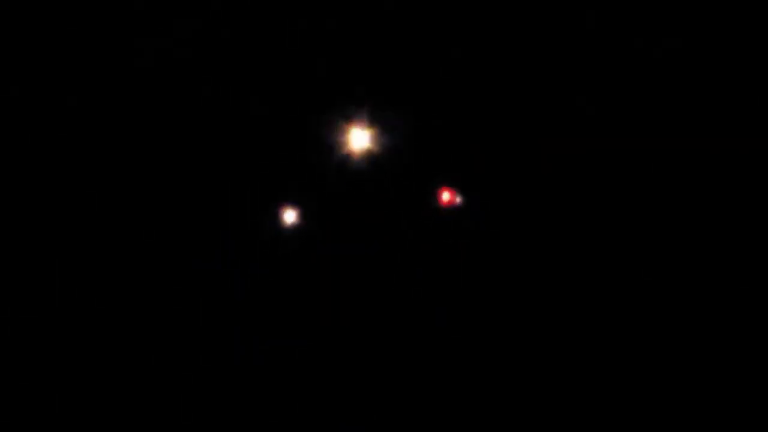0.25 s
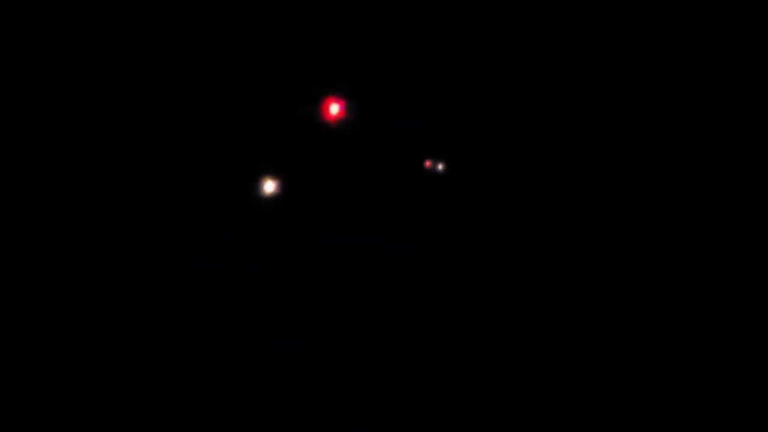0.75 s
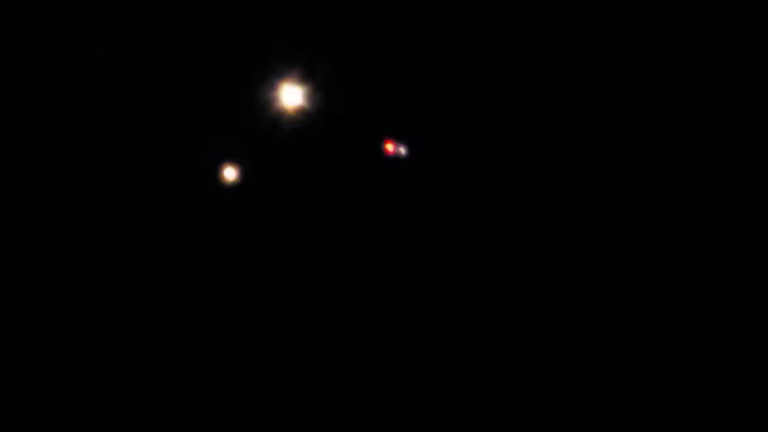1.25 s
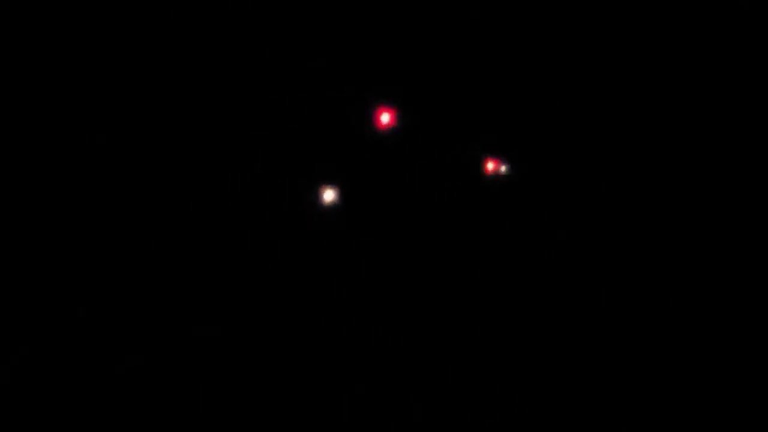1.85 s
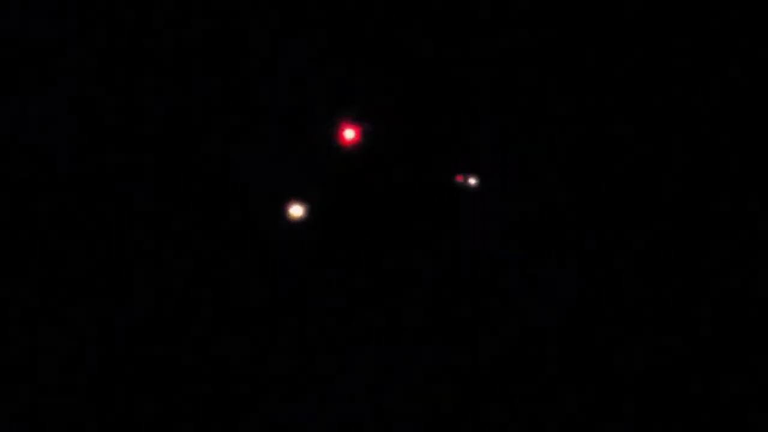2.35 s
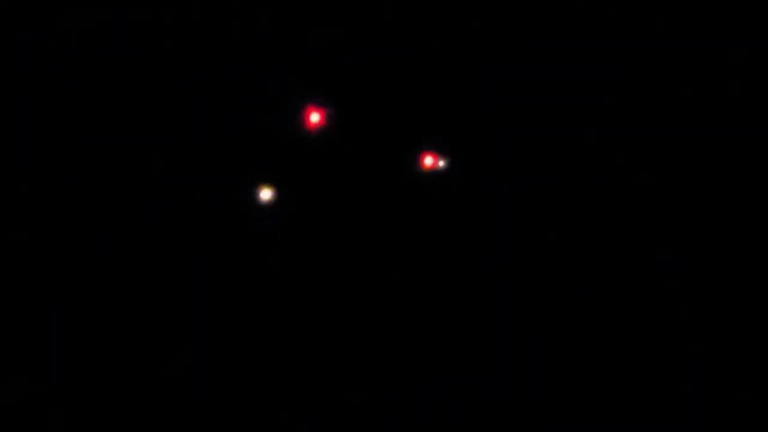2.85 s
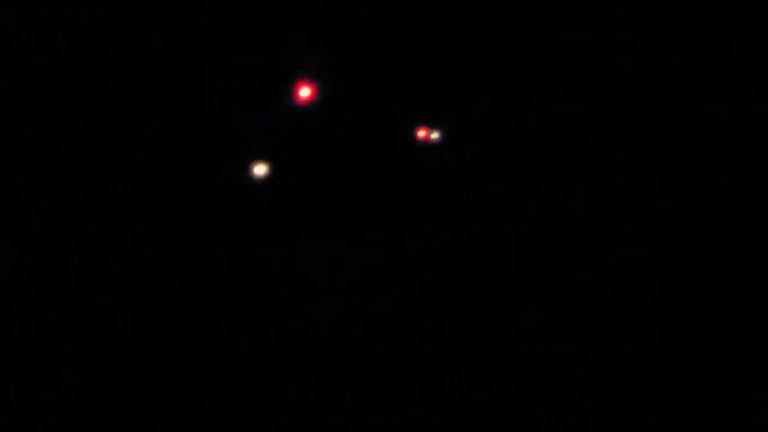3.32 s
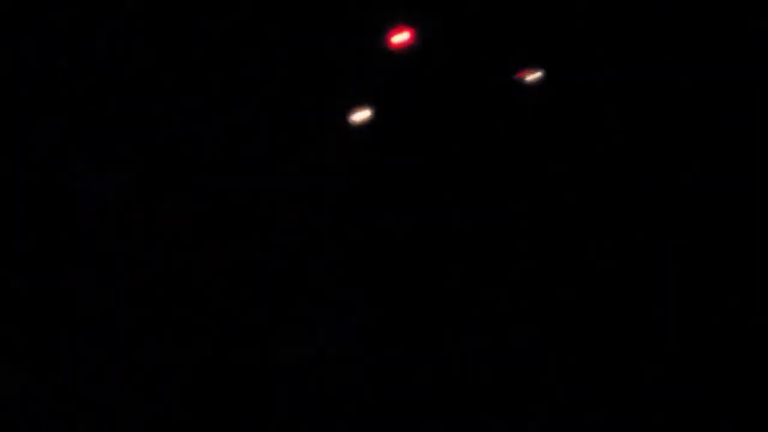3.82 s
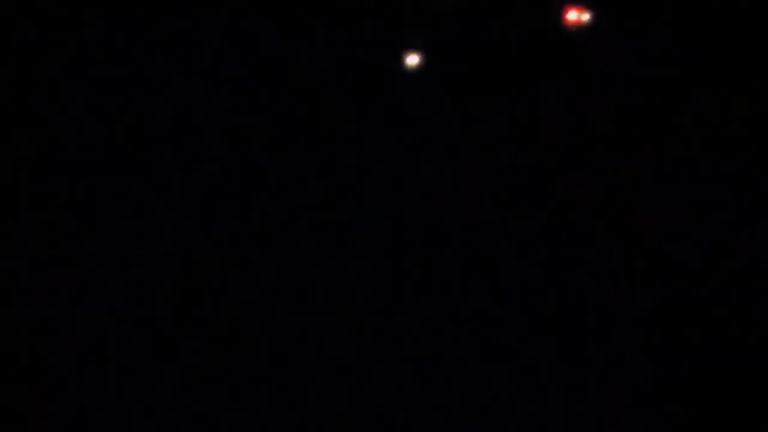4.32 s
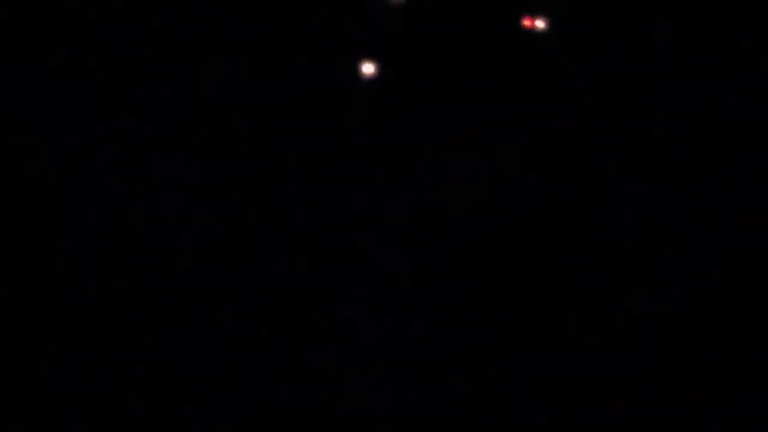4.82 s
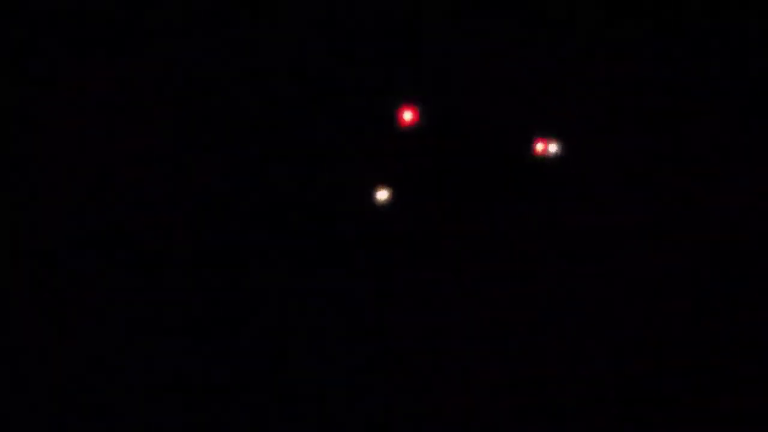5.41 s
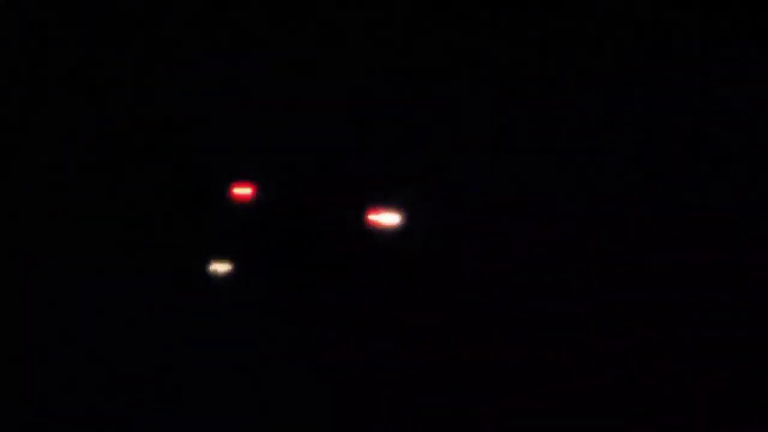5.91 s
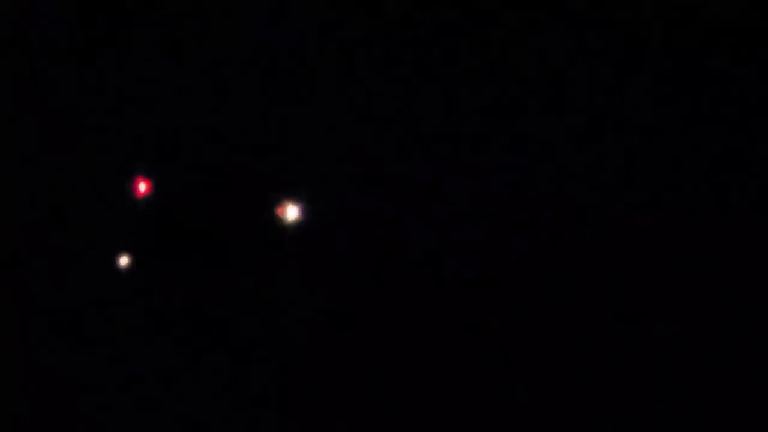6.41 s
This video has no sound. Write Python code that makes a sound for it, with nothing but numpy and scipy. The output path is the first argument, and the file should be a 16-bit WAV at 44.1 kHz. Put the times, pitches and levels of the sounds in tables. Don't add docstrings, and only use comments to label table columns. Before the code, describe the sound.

Propeller aircraft drones and rushes across a night sky, slowly receding, then a nearby vehicle's brakes squeal faintly and it pulls away with a deep boom.

```python
import sys
import numpy as np
from scipy import signal
from scipy.fft import rfft, irfft, next_fast_len
from scipy.io import wavfile
from scipy.ndimage import uniform_filter1d

SR = 44100
rng = np.random.default_rng(int(sys.argv[2]) if len(sys.argv) > 2 else 0)


def waveform_to_disk(signal):
    frames = np.transpose(np.atleast_2d(signal))
    scaled = np.clip(frames, -1, 1) * 32767
    samples = np.round(scaled).astype(np.int16)
    wavfile.write(sys.argv[1], SR, samples)


def boost_factor(decibels):
    exponent = np.asarray(decibels, float) / 20
    return 10 ** exponent


N = 293706
TIME = np.arange(N) / SR


def bell(t_s, half_s):
    return np.exp(-((TIME - t_s) / half_s) ** 2)


def swells(rows, rest_db=-120):
    gain = boost_factor(rest_db) + sum(boost_factor(db) * bell(t_s, half_s) for t_s, db, half_s in rows)
    return 20 * np.log10(gain)


def walk(rate_hz):
    stride = 32
    hold = max(int(SR / stride / rate_hz), 1)
    steps = np.repeat(rng.standard_normal(N // stride // hold + 2), hold)
    coarse = uniform_filter1d(uniform_filter1d(steps, hold), hold)
    return 1.3 * np.interp(TIME, np.arange(len(coarse)) * stride / SR, coarse)


def tone(hz, db, wobble_rad, flutter_db, rate_hz):
    out = np.zeros(N)
    live = db > -110
    phase = 2 * np.pi * (np.cumsum(hz[live]) / SR + rng.random())
    phase = phase + wobble_rad * walk(rate_hz)[live]
    level_db = (db + flutter_db * walk(rate_hz))[live]
    out[live] = np.sqrt(2) * boost_factor(level_db) * np.sin(phase)
    return out


# f/Hz, correlation, left minus right/dB
PORTS = [(100, .99, 1), (260, 0.93, -0.5), (430, 0.62, -0.4), (700, 0.32, -0.5), (1030, -0.19, -1),
         (2000, 0.03, 1), (2460, -0.061, 1.2), (3300, 0.5, 1), (4850, -.15, 0), (5970, .25, 0),
         (7600, -.3, 7), (9800, .1, 0.5), (12000, -.2, 5.5)]


def air(colour, db, swell_db, flicker_db, rate_hz):
    size = next_fast_len(N)
    octave = np.log2(np.maximum(np.arange(size // 2 + 1) * SR / size, 1))
    hz, colour_db = np.transpose(colour)
    port_hz, like, pan_db = np.transpose(PORTS)
    like = np.clip(np.interp(octave, np.log2(port_hz), like), -1, 1)
    pan = boost_factor(np.interp(octave, np.log2(port_hz), pan_db) / 2)
    mid, side = rfft(rng.standard_normal((2, size))) * np.sqrt([1 + like, 1 - like])
    shape = boost_factor(np.interp(octave, np.log2(hz), colour_db, left=-200, right=-200))
    ports = shape * np.array([(mid + side) * pan, (mid - side) / pan])
    out = 0
    swell = walk(1.5)
    for centre in np.arange(np.log2(hz[0]), np.log2(hz[-1]) + 1 / 3, 1 / 3):
        share = np.clip(1 - 3 * abs(octave - centre), 0, 1)
        swell = 0.8 * swell + 0.6 * walk(1.5)
        band_db = swell_db * swell + flicker_db * walk(rate_hz)
        out = out + irfft(ports * share, size)[:, :N] * boost_factor(band_db)
    return out * boost_factor(db) / np.sqrt(np.mean(out ** 2))


# f/Hz, level/dB per Hz
RUSH_COLOUR = [(140, -32.5), (230, -3.5), (280, -4), (314, -5), (467, -6), (715, -3), (831, -5.5),
               (949, -10), (1380, -14), (2200, -29.5), (2860, -55), (4840, -120)]
# t/s, boost/dB, half length/s
GUSTS = [(.1, 1, .3), (2, 0.7, 0.45), (3.85, 1.1, .3), (6.5, 1.5, .2)]


def exhaust_rush():
    db = -44.5 - 0.1346 * TIME + sum(boost_db * bell(t_s, half_s) for t_s, boost_db, half_s in GUSTS)
    return air(RUSH_COLOUR, db + 3.0, swell_db=0.43, flicker_db=1.15, rate_hz=8)


# t/s, f/Hz, level/dB
BLADES = [(0, 64.9, -47), (.4, 63.05, -35.5), (.6, 62.96, -30.5), (1, 61.6, -34), (1.2, 60.26, -37),
          (1.55, 60.22, -27.5), (2.15, 62.45, -34), (2.4, 61.35, -25.5), (2.62, 59.93, -32.5),
          (3.05, 65.2, -29), (3.35, 64.9, -26.5), (3.8, 63.2, -36), (4, 63.3, -33.5), (4.2, 62, -36.5),
          (4.8, 61.2, -31), (5.2, 61, -40), (5.6, 59.7, -33.5), (6, 57, -41.5)]
# t/s, level/dB, half length/s
SHAFT_SWELLS = [(1, -37, .5), (2, -38, 0.65), (3.2, -38, 0.23), (3.7, -37, .2), (4.3, -38.5, 0.37),
                (4.84, -36.5, 0.14)]
BEAT_SWELLS = [(.3, -31.5, 0.24), (.8, -34.5, 0.11), (1.2, -36, .12), (1.85, -38, 0.25), (2.2, -34.5, 0.14),
               (3.1, -34.5, .2), (3.6, -35, 0.13), (4.25, -31.5, 0.26), (4.8, -30, .3), (5.6, -30, .1)]
EXHAUST_SWELLS = [(.08, -38.5, 0.15), (.55, -42.5, 0.18), (.88, -40, 0.097), (1.62, -39, 0.21),
                  (2.12, -42.5, 0.16), (2.83, -37, .12), (3.4, -47, 0.31), (4.15, -41.5, .17),
                  (4.58, -40.5, 0.12), (4.95, -45, 0.15), (5.25, -43, 0.092), (5.9, -42.5, 0.28),
                  (6.6, -42.5, .15)]
THIRD_SWELLS = [(.4, -45, 0.61), (2.1, -49, 0.32), (2.95, -47.5, .2), (3.6, -54, .3)]
INTAKE_SWELLS = [(3, -48.5, 0.29), (4.2, -52.5, .6), (5.2, -54.5, 0.17), (6.4, -46.5, 0.38)]


def drone():
    t_s, hz, db = np.transpose(BLADES)
    blade_hz = np.interp(TIME, t_s, hz)
    second_hz = blade_hz + 12.6 - 0.416 * TIME
    exhaust_hz = 158.5 - 1.5 * TIME
    lows = [(0.727 * blade_hz, swells(SHAFT_SWELLS, -54)),
            (blade_hz, np.interp(TIME, t_s, db)),
            (second_hz, swells(BEAT_SWELLS, -51))]
    highs = [(2.93 * blade_hz, swells(THIRD_SWELLS, -67)),
             (1.335 * exhaust_hz, swells(INTAKE_SWELLS, -66))]
    low = sum(tone(hz, db, wobble_rad=0.22, flutter_db=1.2, rate_hz=9) for hz, db in lows)
    high = sum(tone(hz, db, wobble_rad=0.15, flutter_db=2, rate_hz=10) for hz, db in highs)
    exhaust_db = swells(EXHAUST_SWELLS, -58.5)
    return low + high + tone(exhaust_hz, exhaust_db, wobble_rad=0.11, flutter_db=1.5, rate_hz=12)


# f/Hz, level/dB per Hz
RUMBLE_COLOUR = [(14, -24.5), (32, -22.5), (42, -4.5), (60, -3.5), (100, -1), (130, -7), (190, -7.5),
                 (225, -12), (260, -27.5)]


def rumble():
    since_s = TIME - 5.49
    onset = (1 + np.tanh(since_s / 0.12)) / 2
    db = -39 - 1.12 * TIME + onset * (8 - 2 * since_s)
    return air(RUMBLE_COLOUR, db + 3.5, swell_db=1.1, flicker_db=0.0, rate_hz=5.4)


# f/Hz, level/dB per Hz
HISS_COLOUR = [(1700, -20), (2200, -2), (2700, -2), (3300, -5), (4300, -10.5), (5200, -11), (6200, -12.5),
               (7000, -19), (8000, -32)]
# t/s, level/dB, half length/s
TYRE_PUFFS = [(5.93, -79.5, 0.11), (6.15, -77.5, 0.052), (6.35, -84.5, 0.17)]


def hiss(stutter_db):
    db = swells(TYRE_PUFFS, -73.5 - 0.36 * TIME)
    return air(HISS_COLOUR, db + 7 + 0.6 * stutter_db, swell_db=0.4, flicker_db=1.4, rate_hz=20)


# f/Hz, level/dB per Hz
CAPSULE_COLOUR = [(6500, -13.5), (7500, -4.5), (8200, -8), (9000, -5), (9800, -11.5), (10600, -5.5),
                  (11200, -0.5), (12200, -1), (13500, -4.5), (15800, -3.5)]


def capsule_noise(stutter_db):
    return air(CAPSULE_COLOUR, stutter_db - 82, swell_db=0.2, flicker_db=0.6, rate_hz=30)


# t/s, level/dB, half length/s
INSECT_BURSTS = [(2.75, -83.5, 0.23)]


def insects():
    hz = np.full(N, 5720.0)
    db = swells(INSECT_BURSTS, -80.5 - 3 * TIME)
    chorus = []
    for _ in range(2):
        throb = boost_factor(2.7 * walk(9) + 2.5 * walk(3.3))
        chorus.append(tone(hz, db, wobble_rad=2.3, flutter_db=2.0, rate_hz=900) * throb)
    return np.array(chorus) * boost_factor([[-2.5], [2.5]])


# t/s, level/dB, half length/s
MAINS_SWELLS = [(.6, -57, .3), (2.1, -55, .6), (4.5, -59, .8), (6.2, -53.5, .8)]


def mains_hum():
    db = swells(MAINS_SWELLS, -72)
    return tone(np.full(N, 321.1), db, wobble_rad=0.17, flutter_db=1.0, rate_hz=9)


# t/s, f/Hz, glide/Hz per s,
# level/dB, half length/s
GLIDING_HUMS = [(1.92, 112.8, 9, -41.5, 0.17), (2.44, 117.7, 2, -35.5, .15), (6.22, 122.3, -13, -38, .22),
                (6.62, 117.5, 1, -41.5, .1), (5.72, 74, 13, -35, 0.3), (6.62, 47, 0.5, -38.5, .15),
                (6.1, 77, -7.5, -32.5, .2), (6.62, 75, 0, -36, .1)]


def gliding_hums():
    out = 0
    for t_s, hz, glide, db, half_s in GLIDING_HUMS:
        level_db = swells([(t_s, db, half_s)])
        out = out + tone(hz + glide * (TIME - t_s), level_db, wobble_rad=0.2, flutter_db=0.8, rate_hz=9)
    return out


# t/s, rms level/dB, length/s
RUSTLES = [(3.822, -70, .03), (4.6, -75, 0.032), (6.143, -70.5, 0.023), (6.19, -74, .015),
           (6.235, -72, .02)]


def rustle():
    band = signal.butter(4, [2000, 7000], "band", fs=SR, output="sos")
    noise = signal.sosfilt(band, rng.standard_normal((2, N)))
    return 2 * noise * sum(boost_factor(db) * bell(t_s, length_s) for t_s, db, length_s in RUSTLES)


# t/s, level/dB, f/Hz, t60/s, left minus right/dB
TICKS = [(4.148, -48, 4160, 0.006, -1), (4.148, -56, 3780, 0.0055, 7), (5.555, -45.5, 3300, .004, 4),
         (5.555, -54, 2950, .007, 2), (5.555, -56, 4485, .0035, -6), (5.556, -59, 12000, .004, -7.5),
         (5.556, -66.5, 14800, .003, 1.5), (5.555, -66, 6507, .003, 0), (5.767, -62, 6803, 0.0045, 0),
         (5.796, -71, 5300, 0.0075, -7), (5.955, -45, 1892, 0.016, -1), (5.956, -63, 3420, .006, 1.5),
         (6.146, -52, 2300, .012, 0.5), (6.168, -62, 5320, 0.0097, 0), (6.188, -47, 1950, 0.0204, -1),
         (6.284, -61, 5210, .005, -1), (4.084, -50, 1500, 0.0075, -9), (4.09, -64, 5299, 0.0062, -3),
         (5.51, -69, 3300, 0.079, 0), (6.425, -64, 3300, 0.069, 1), (6.495, -63, 3210, 0.058, 0.5)]


def ticks():
    out = np.zeros((2, N))
    t = np.arange(2048) / SR
    for t_s, db, hz, t60_s, pan_db in TICKS:
        push = 1 - np.exp(-t / 0.0006)
        ring = push * np.exp(-np.log(1000) * t / t60_s) * np.sin(2 * np.pi * hz * t)
        i = int(t_s * SR)
        port_db = db + np.array([[pan_db], [-pan_db]]) / 2
        out[:, i:i + 2048] += boost_factor(port_db) * ring / abs(ring).max()
    return out


# t/s, fundamental level/dB, half length/s, octave above fundamental/dB
GRABS = [
    [(5.262, -68, .032, 1), (5.312, -61, 0.01, -9), (5.342, -71, .025, 5), (5.445, -84, .025, 6)],
    [(5.327, -63.5, 0.025, -8), (5.385, -66, .033, -6)],
]
# delay/s, level/dB
SQUEAL_ECHOES = [(.011, -6), (.026, -12)]


def squeal():
    pads = 0
    for start_hz, sag_hz_per_s, grabs in zip((2533, 2463), (0, 110), GRABS):
        hz = start_hz - sag_hz_per_s * (TIME - 5.33)
        first_db = swells([(t_s, db, half_s) for t_s, db, half_s, _ in grabs])
        octave_db = swells([(t_s, db + over_db, half_s) for t_s, db, half_s, over_db in grabs])
        pads = pads + tone(hz, first_db, wobble_rad=0.4, flutter_db=2.5, rate_hz=130)
        pads = pads + tone(2 * hz, octave_db, wobble_rad=0.8, flutter_db=2.5, rate_hz=160)
    ports = []
    for _ in range(2):
        echoes = sum(boost_factor(db) * np.roll(pads, int(delay_s * SR * rng.uniform(0.87, 1.2)))
                     for delay_s, db in SQUEAL_ECHOES)
        ports.append(pads + echoes)
    return np.array(ports)


# t/s, firing f/Hz, fundamental level/dB, octave level/dB
REV = [(5.4, 47.4, -42, -53), (5.56, 55.6, -36, -53), (5.7, 64.92, -35.5, -45), (5.8, 76.56, -25, -31.5),
       (5.91, 87.44, -23, -31.5), (6.04, 91.32, -32.5, -33.5), (6.3, 87.5, -28, -32),
       (6.45, 86.37, -23, -37), (6.66, 87.46, -24.5, -37.5)]
# f/Hz, width/Hz, boost/dB
BOOMS = [(57, 3, 6), (70.9, 3.4, 14)]


def rev():
    t_s, hz, first_db, octave_db = np.transpose(REV)
    hz = np.interp(TIME, t_s, hz)
    span_s = np.r_[t_s[0] - 0.08, t_s, t_s[-1] + 0.08]
    first_db, octave_db = (np.interp(TIME, span_s, np.r_[-120, db, -120]) for db in (first_db, octave_db))
    first_db = first_db + sum(db * np.exp(-((hz - f) / width_hz) ** 2) for f, width_hz, db in BOOMS)
    first = tone(hz, first_db, wobble_rad=0.064, flutter_db=0.0, rate_hz=13)
    return first + tone(2 * hz, octave_db, wobble_rad=0.06, flutter_db=0.75, rate_hz=11)


# t/s, level/dB, half length/s
WHINE = [(5.81, -57.5, 0.052), (6.18, -63, 0.41)]


def gear_whine():
    hz = np.full(N, 1860.0)
    return np.array([tone(hz, swells(WHINE), wobble_rad=1.3, flutter_db=3, rate_hz=180)
                     for _ in range(2)])


def scene():
    stutter_db = 1.9 * walk(110)
    sky = exhaust_rush() + drone() + rumble() + hiss(stutter_db) + capsule_noise(stutter_db)
    town = insects() + mains_hum() + gliding_hums()
    vehicle = squeal() + rev() + gear_whine()
    return sky + town + rustle() + ticks() + vehicle


def low_pass(x):
    return signal.sosfilt(signal.butter(12, 15720, fs=SR, output="sos"), x)


def record(dry):
    left = signal.sosfilt(signal.butter(1, 22, "high", fs=SR, output="sos"), dry[0])
    right = signal.sosfilt(signal.butter(1, 6, "high", fs=SR, output="sos"), dry[1])
    gate = np.sin(np.pi / 2 * np.clip(TIME / 0.004, 0, 1)) ** 2
    return low_pass(gate * np.array([left, right]))


dry = scene()
out = record(dry)
waveform_to_disk(out)
```